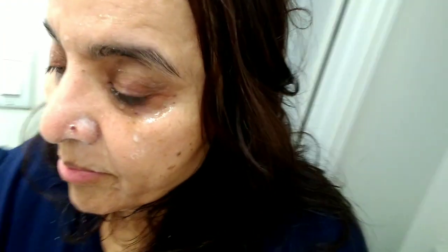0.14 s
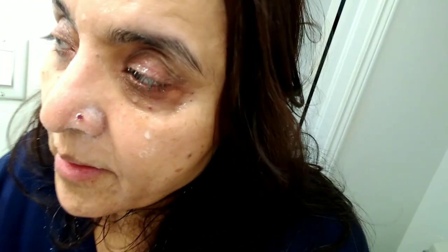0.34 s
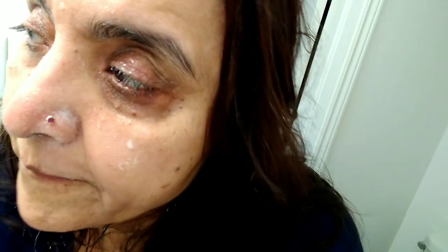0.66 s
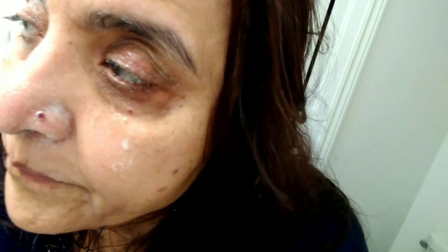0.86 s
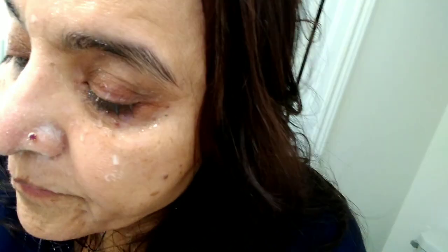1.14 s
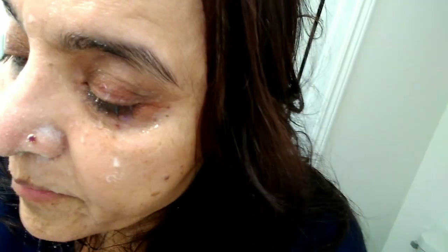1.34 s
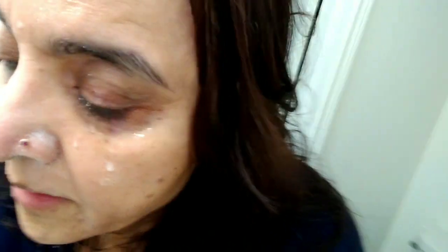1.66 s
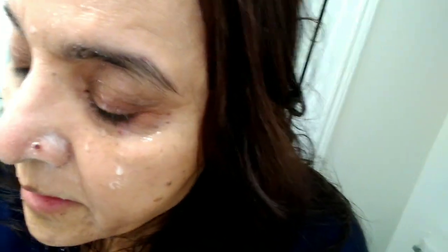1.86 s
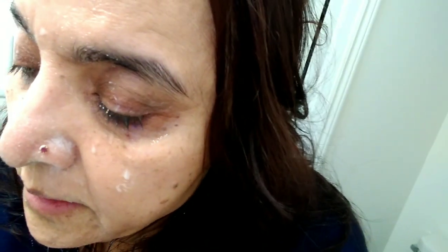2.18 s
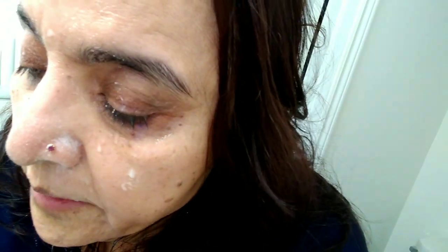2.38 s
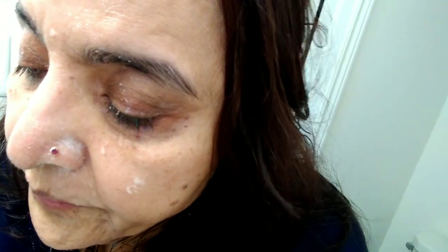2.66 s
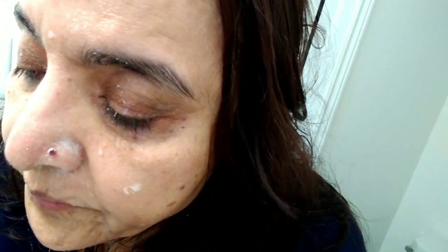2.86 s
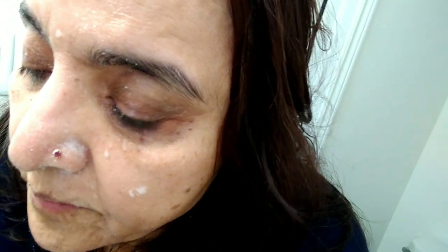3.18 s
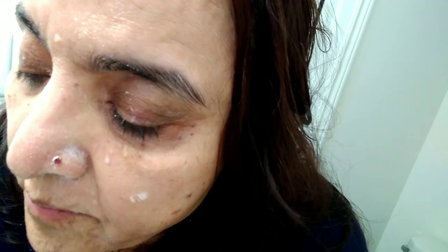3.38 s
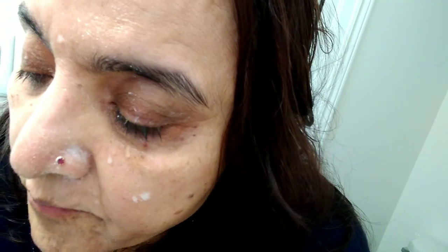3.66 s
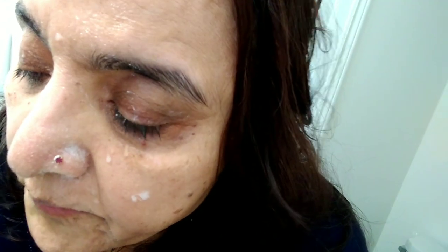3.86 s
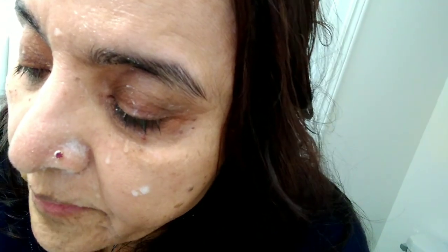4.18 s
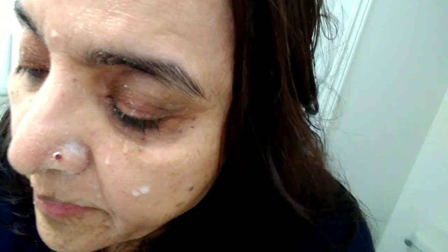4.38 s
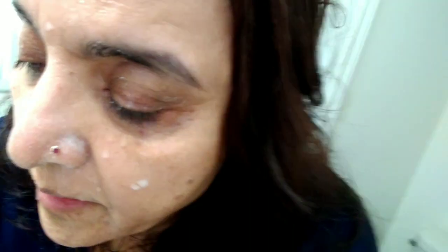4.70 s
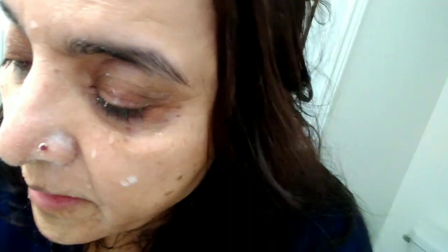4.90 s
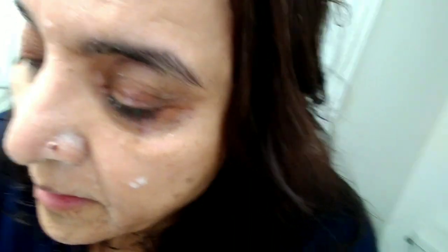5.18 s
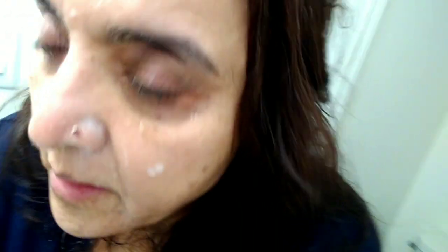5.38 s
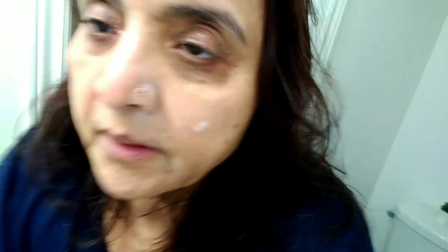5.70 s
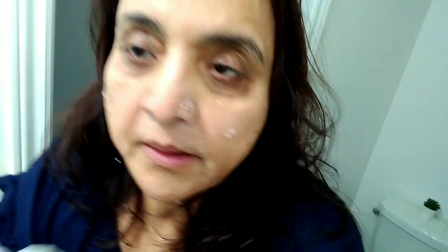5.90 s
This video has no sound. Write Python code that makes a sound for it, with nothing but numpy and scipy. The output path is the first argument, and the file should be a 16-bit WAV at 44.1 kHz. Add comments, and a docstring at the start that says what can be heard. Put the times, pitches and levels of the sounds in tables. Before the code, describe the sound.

Water hisses briefly in a sink, then dies away into tiny drips. Two loud clunks from a tissue holder follow as the roll starts turning, with light paper rustling and hollow knocks from the cardboard core. The tugs grow stronger and three more clunks ring in the small bathroom. The sounds lean left of a hand-held microphone, which picks up a few faint handling ticks and a low room rumble.

```python
"""Bathroom tap and tissue roll

A tap fizzes into a basin and is shut off; the last drops tick in the drain.
Then tissue is pulled from a roll: the paper rustles, the roll rubs and bumps, its wall holder clunks.
The small hard room rings after each knock. A hand-held camera, brighter on its left, creaks faintly."""
import sys
import numpy as np
from scipy import signal
from scipy.fft import rfft, irfft, next_fast_len
from scipy.io import wavfile
from scipy.ndimage import uniform_filter1d, map_coordinates

SR = 44100
rng = np.random.default_rng(int(sys.argv[2]) if len(sys.argv) > 2 else 0)


def dump_mix(stems):
    """Bounce the given channels to the path in sys.argv[1] as a 16-bit WAV at rate SR."""
    frames = np.atleast_2d(stems).T  # one column per channel
    limited = np.clip(frames, -1, 1)  # hard clip at full scale
    pcm = np.round(limited * 32767).astype(np.int16)
    wavfile.write(sys.argv[1], SR, pcm)


N = 266805

# how much louder most sounds are on the left: pitch_hz, left_minus_right_db
LEFT_LEAN = [(100, -0.5), (250, 1), (500, 4), (1000, 1), (2200, 6.5), (4500, 7.5), (8000, 13.5),
             (15000, 12)]


def tap():
    """The airy jet fizzes and drums in the basin; both fade as the valve closes."""
    # tone of the fizz: pitch_hz, level_db
    spray_tone = [(530, -28), (900, -15.5), (1320, -12), (1530, -8.5), (3470, -1), (3910, -4), (4460, 1),
                  (7680, -2), (13000, 2.5), (16000, -6)]
    # tone of the drumming: pitch_hz, level_db
    basin_tone = [(50, -7.5), (95, -4.5), (150, -12.5), (210, 0), (257, -14.5), (320, -5), (520, -20),
                  (700, -9), (1050, -17.5), (1500, -24), (2500, -60.5)]
    # the water is to the left: pitch_hz, left_minus_right_db
    lean = [(100, 0), (500, 3), (2500, 2), (5000, 13.5), (8000, 15), (15000, 19)]
    closing_db_per_s, collapse_db_per_s, shut_s = 46.5, 224, 0.28
    t = np.arange(N) / SR
    flow_db = -closing_db_per_s * t - collapse_db_per_s * np.maximum(t - shut_s, 0)
    # the thinning jet gulps once
    gulp = swells([.143], rise_s=[.012], level_db=[-42.5], hold_s=.015, release_db_per_s=177)
    spray = grains(per_s=6000, spread_db=5.5, echo_db=3) * amp(0.45 * wobble(120))
    fizz = unit(stereo(spray, spray_tone, lean))
    drumming = unit(stereo(grains(per_s=600, spread_db=-2, echo_db=3), basin_tone, lean))
    basin_gain = np.hypot(amp(-44.5 + 0.61 * flow_db), gulp)  # fades more slowly than the fizz
    return amp(-38.5 + flow_db) * fizz + basin_gain * drumming


def drop(db, hz, splash_db):
    """A drop ticks as it lands and traps a small bubble whose pitch rises as it dies."""
    t = np.arange(SR // 40) / SR
    bubble = np.sin(2 * np.pi * hz * t * (1 + 3 * t)) * np.exp(-hz * t / 4)
    bubble[0] = amp(splash_db)  # the landing tick
    echoes = hit(contact_s=0.0013, direct_db=4.5, early_fade_s=0.12, late_db=-16.5)
    return amp(db) * unit_attack(signal.fftconvolve(echoes, bubble[None], axes=1))


def drops(bubble_count=26):
    """A few clear drops fall over small bubbles that fade as the basin drains."""
    # the last drops: start_s, level_db, pitch_hz, splash_db
    last_drops = [(.241, -57.5, 4830, 16), (.303, -60, 3100, 0), (0.3207, -58.5, 3180, 8),
                  (.378, -72, 4530, -3), (.4827, -75, 5100, 17), (.50, -76, 2700, 5), (.565, -78, 2700, -2),
                  (.599, -76.5, 2290, 0), (.6158, -72, 2420, 8)]
    out = np.zeros((2, N))
    for s, db, hz, splash_db in last_drops:
        add(out, s, drop(db, hz, splash_db))
    for k, (when, softness, pitch) in enumerate(rng.random((bubble_count, 3))):
        s = .75 * (k + when) / bubble_count
        db = np.interp(s, [.15, .45, .75], [-53, -79, -86])
        add(out, s, drop(db - 6 * softness, hz=2300 * 3 ** pitch, splash_db=-0.2))
    return out * amp([[2.5], [-2.5]])  # louder on the left


def tissue():
    """Each tug snaps fibres in clumps and turns the roll, which rubs; now and then its core scrapes."""
    # tugs at the sheet: fastest_s, rise_s, rustle_db, rub_db
    tugs = [(.82, 0.034, -70.5, -59.5), (.96, 0.058, -66, -60), (1.11, .04, -62.5, -44),
            (1.21, 0.045, -62.5, -49), (1.40, 0.15, -60.5, -42.5), (1.67, 0.074, -60, -45),
            (1.747, 0.008, -59, -45), (1.865, 0.016, -61.5, -53), (2.121, 0.038, -63.5, -60),
            (2.372, 0.066, -59, -53), (2.59, 0.024, -57.5, -54), (2.673, 0.014, -58, -46),
            (2.952, .07, -61, -46.5), (3.12, 0.05, -67.5, -62), (3.241, 0.027, -60.5, -54),
            (3.41, .025, -68.5, -58), (3.615, 0.014, -61, -54), (3.76, 0.11, -64, -53),
            (3.88, 0.079, -57.5, -51.5), (3.977, 0.044, -51.5, -43), (4.225, 0.033, -58.5, -52.5),
            (4.41, 0.051, -56.5, -40), (4.713, 0.033, -48.5, -38), (4.89, 0.037, -50.5, -37.5),
            (5.032, 0.0097, -46, -42.5), (5.59, 0.025, -79.5, -78), (5.67, 0.02, -68, -75),
            (5.848, .07, -70, -73.5)]
    # the sheet stirs faintly while in the hand: start_s, end_s
    in_hand = [(.85, 3.15), (3.65, 5.25)]
    # the core slides along the spindle: fastest_s, rise_s, level_db
    scrapes = [(1.755, 0.011, -53), (2.565, 0.02, -54), (2.689, 0.023, -49), (3.645, 0.022, -57.5),
               (3.78, 0.026, -65), (4.0, .09, -55.5)]
    # tone of the rustling sheet: pitch_hz, level_db
    paper_tone = [(500, -29.5), (1000, -6), (2000, -2), (4000, -7.5), (7000, -16), (10000, -17),
                  (13500, -14.5), (16000, -19)]
    # tone of the rubbing roll: pitch_hz, level_db
    roll_tone = [(100, -4), (220, -3.5), (400, -2), (600, -8.5), (850, -11.5), (1100, -11.5), (1500, -19),
                 (2500, -22.5), (5000, -53)]
    # tone of the scraping core: pitch_hz, level_db
    core_tone = [(900, -31), (1700, -4.5), (2400, 0), (3200, -5.5), (4000, -22.5), (8000, -43)]
    s, rise_s, rustle_db, rub_db = np.transpose(tugs)
    t = np.arange(N) / SR
    held = sum(1. * ((t > start) & (t < end)) for start, end in in_hand)
    held = uniform_filter1d(held, size=SR // 10)
    # after a tug the sheet slackens quickly, while the roll coasts a little
    rustle = np.hypot(swells(s, rise_s, rustle_db, hold_s=0.017, release_db_per_s=199.5), amp(-74) * held)
    rub = np.hypot(swells(s, rise_s, rub_db, hold_s=0.048, release_db_per_s=169), amp(-66.5) * held)
    scrape = swells(*np.transpose(scrapes), hold_s=.01, release_db_per_s=382)
    fibres = grains(per_s=7000, spread_db=10.5, echo_db=8) * amp(wobble(83))
    paper = unit(stereo(fibres, paper_tone, LEFT_LEAN))
    roll = unit(stereo(grains(per_s=900, spread_db=-1, echo_db=4), roll_tone, LEFT_LEAN))
    core = unit(stereo(grains(per_s=990, spread_db=-3.5, echo_db=2), core_tone, LEFT_LEAN))
    return rustle * paper + rub * roll + scrape * core


def holder_clunks():
    """The holder hits the same spot on its bracket, so its clunks share their notes and most echoes."""
    # the clunks: start_s, level_db, bass_db, treble_db
    clunks = [(1.2770, -16, -1, 0.5), (1.554, -17.5, 0.5, -1.5), (4.5221, -19, 5, -0.5),
              (4.8480, -19, 2.5, 0.5), (5.1, -17, -0.5, -4)]
    # tone of the impact: pitch_hz, level_db
    clunk_tone = [(110, -26.5), (200, -5.5), (272, -9.5), (360, -1), (525, -9), (660, -10.5), (736, -2),
                  (830, -9), (1050, -1), (1220, -6), (1380, -14), (2250, -14), (4800, -30), (6100, -31),
                  (7800, -40), (12500, -37.5), (16000, -46)]
    # ringing notes of holder and room: pitch_hz, level_db, fade_s
    holder_notes = [(76, -15.5, 0.32), (94.9, -19, 0.6), (138.0, -10, 0.36), (229.3, -8.5, 0.36),
                    (255, -14.5, 0.26), (335, -2.5, 0.33), (395, -2.5, 0.3), (448, -9.5, 0.38),
                    (598.3, -2, 0.24), (732, -16, 0.42), (867, -8.5, 0.2), (903, -5.5, 0.28),
                    (1014, -7, 0.19), (1116, -11, 0.14), (1225, -1.5, 0.2)]
    out, t = np.zeros((2, N)), np.arange(SR // 2) / SR
    strike = lambda: hit(contact_s=.006, direct_db=-5, early_fade_s=.22, late_db=-11.5)
    shared = strike()
    push_s = .0004
    shared[0] += amp(3.5) * t / push_s * np.exp(-t / push_s)  # the first push reaches both sides at once
    for s, db, bass_db, treble_db in clunks:
        crack = unit_attack(stereo(shared + 0.77 * strike(), clunk_tone, LEFT_LEAN))
        clunk = amp(-2.5) * crack + amp(-9) * ringing(holder_notes)
        add(out, s, amp(db) * contact_tone(clunk, bass_db, treble_db))
    return out


def roll_bumps():
    """The cardboard core drops on the spindle: a hollow knock, deeper and heavier when it lands softly."""
    # the bumps: start_s, level_db, treble_db, pitch_hz
    bumps = [(0.947, -55.5, 19, 348), (0.985, -55.5, -8, 1080), (1.058, -30, -0.5, 1340),
             (1.203, -44, -7, 706), (1.466, -36.5, 7, 730), (1.544, -32, -6, 805), (1.777, -30.5, -5, 1130),
             (1.846, -37, -2.5, 583), (2.209, -55.5, 2, 614), (2.256, -48.5, -9, 555),
             (2.588, -42, -12, 670), (2.815, -26.5, -4.5, 1060), (3.235, -47, 12, 478),
             (3.377, -51.5, -4, 550), (3.418, -48.5, -12, 647), (3.608, -40.5, -0.5, 870),
             (3.907, -46.5, 15.5, 646), (3.975, -42.5, 2, 530), (4.045, -47.5, -8.5, 930),
             (4.204, -49, -4, 630), (4.278, -35, -5, 567), (4.358, -28, -5, 1040), (5.031, -33.5, -3, 730)]
    # tone of the impact: pitch_hz, level_db
    bump_tone = [(59, -40), (100, -15), (219, -2), (277, -6), (583, -4), (784, -7.5), (1060, -9),
                 (1310, -10), (1610, -14), (1830, -16), (2690, -21), (7940, -41), (15000, -45),
                 (16000, -61)]
    # ringing notes of the core: pitch_hz, level_db, fade_s
    tube_notes = [(399.7, -5.5, 0.33), (583.5, -3.5, 0.24), (1042, -0.5, 0.11), (1613, -7, 0.11)]
    # the hollow note and one overtone stand out: pitch_multiple, gain_db
    hollow = [(.75, 2), (1, 5.5), (1.25, -0.5), (1.55, 2), (2.1, -3), (5, -2.5)]
    out = np.zeros((2, N))
    for s, db, treble_db, hz in bumps:
        contact = hit(contact_s=.004, direct_db=1.5, early_fade_s=0.2, late_db=-3)
        knock = unit_attack(stereo(contact, bump_tone, LEFT_LEAN)) + amp(-5.5) * ringing(tube_notes)
        hollow_tone = [(multiple * hz, gain_db) for multiple, gain_db in hollow]
        knock = filtered(knock, lambda f: along(hollow_tone, f))
        bass_db = 5.5 - 12 * np.log2(hz / 623)  # deeper bumps thump more
        add(out, s, amp(db) * unit_attack(contact_tone(knock, bass_db, treble_db)))
    return out


def case_creaks():
    """The camera's plastic case gives dry little ticks, mostly on the right."""
    # the creaks: start_s, level_db
    creaks = [(4.937, -41.5), (5.237, -40.5), (5.5112, -54.5)]
    # tone of the case: pitch_hz, level_db
    case_tone = [(180, -10), (300, -7.5), (523, -4), (723, -12), (1030, -4.5), (1590, -10), (1940, -3.5),
                 (2690, -26), (3180, -14), (4980, -30.5), (12000, -41), (15600, -82), (22000, -120)]
    # low and middle pitches sit right, the highest left: pitch_hz, left_minus_right_db
    lean = [(300, -10), (2000, -39), (4000, 9), (7000, 22)]
    out = np.zeros((2, N))
    for s, db in creaks:
        tick = hit(contact_s=0.0092, direct_db=12.5, early_fade_s=0.085, late_db=-6)
        add(out, s, amp(db) * unit_attack(stereo(tick, case_tone, lean)))
    return out


def background():
    """Room noise lies over a low rumble, a wavering hum and a soft double boom."""
    # tone of the room noise: pitch_hz, level_db
    air_tone = [(25, -22), (50, 1.5), (75, 5.5), (150, -8), (280, -18.5), (400, -19.5), (800, -27.5),
                (2500, -29.5), (6000, -42), (16000, -44.5)]
    # it leans a little left: pitch_hz, left_minus_right_db
    lean = [(100, -0.5), (1000, 4), (8000, 4)]
    # rumble and hum swell and ebb: time_s, gain_db
    rumble_curve = [(0, 8.5), (0.7, -9), (1.3, 4.5), (2.2, -3), (5.2, -1.5), (5.8, -8), (6.05, -9.5)]
    # soft low booms: peak_s, rise_s, level_db
    booms = [(.745, 0.023, -44.5), (.84, 0.017, -51.5)]
    hum_hz, boom_hz, rumble_below_hz = 49, 85, 130
    t = np.arange(N) / SR
    swell = amp(np.interp(t, *np.transpose(rumble_curve)))
    hum = amp(2 * wobble(4)) * np.sin(2 * np.pi * hum_hz * t + .7 * wobble(3))
    air = amp(-57.5) * unit(stereo(noise(), air_tone, lean))
    rumble = signal.sosfiltfilt(signal.butter(2, rumble_below_hz, fs=SR, output="sos"), air)
    boom_gain = swells(*np.transpose(booms), hold_s=0.034, release_db_per_s=400)
    boom = boom_gain * np.sqrt(2) * np.sin(2 * np.pi * boom_hz * t + .5 * wobble(20))
    return air - rumble + swell * (rumble + amp(-54) * hum) + boom


def hit(contact_s, direct_db, early_fade_s, late_db):
    """A short contact, the first echoes off near walls, then the room's tail."""
    t = np.arange(SR // 2) / SR
    envelope = amp(direct_db) * np.exp(-(t / contact_s) ** 2) + amp(-60 * t / early_fade_s)
    return envelope * noise(len(t)) + amp(late_db) * room_tail()


def contact_tone(x, bass_db, treble_db):
    """A heavy contact has more bass, a hard one more treble."""
    tone = [(380, bass_db), (800, 0.024), (1400, 0.00089), (2600, treble_db)]
    return filtered(x, lambda hz: along(tone, hz))


def ringing(notes):
    """Struck notes fall 60 dB in fade_s; the high ones reach left and right out of step."""
    t = np.arange(SR // 2) / SR
    ring = 0
    for hz, db, fade_s in notes:
        phase = rng.uniform(0, 2 * np.pi) + rng.standard_normal((2, 1)) * hz / 1400
        lean_db = along(LEFT_LEAN, hz) * np.array([[.5], [-.5]])
        envelope = amp(db + lean_db + rng.normal(0, 1) - 60 * t / fade_s)
        ring = ring + envelope * np.sin(2 * np.pi * hz * t + phase)
    return unit_attack(ring * (1 - np.exp(-t / 0.0029)))


def grains(per_s, spread_db, echo_db):
    """Tiny random snaps of uneven size, with their echoes."""
    happens = rng.random(N) < per_s / SR
    snaps = happens * amp(spread_db * np.minimum(rng.exponential(size=N), 4)) * noise()
    tail = room_tail()
    echoes = signal.fftconvolve(snaps, tail / np.linalg.norm(tail[0]), axes=1)[:, :N]
    return unit(snaps + amp(echo_db) * echoes)


def swells(peak_s, rise_s, level_db, hold_s, release_db_per_s):
    """A loudness curve: each movement builds to its peak, lingers and dies; overlaps add in power."""
    t, power = np.arange(N) / SR, np.zeros(N)
    for peak, rise, db in zip(peak_s, rise_s, level_db):
        before, after = np.maximum(peak - t, 0), np.maximum(t - peak, 0)
        fall_db = release_db_per_s * (np.hypot(after, hold_s) - hold_s)
        power += amp(db - fall_db) ** 2 * np.exp(-2 * (before / rise) ** 2)
    return np.sqrt(power)


def room_tail():
    """Half a second of blurred echoes; each pitch dies at its own speed."""
    # time for the echoes to fall 60 dB: pitch_hz, fade_s
    fade_times = [(120, 0.26), (400, 0.5), (1000, 0.42), (3000, 0.37), (12000, 0.62)]
    hz, t, spectrum = signal.stft(noise(SR // 2), SR, nperseg=256)
    fade = amp(-60 * t / along(fade_times, hz)[:, None])
    return signal.istft(spectrum * fade, SR, nperseg=256)[1][:, :SR // 2]


def stereo(pair, tone, lean):
    """Two unrelated signals become one source, left and right: alike in the bass, apart in the treble."""
    # how alike the two sides are (1 = the same): pitch_hz, likeness
    alike = [(150, 1), (300, 0.98), (500, 0.4), (1000, 0.29), (2000, -0.16), (5000, 0.099)]
    likeness = lambda hz: np.clip(along(alike, hz), -.99, .99)
    mid = filtered(pair[0], lambda hz: 10 * np.log10(1 + likeness(hz)))
    side = filtered(pair[1], lambda hz: 10 * np.log10(1 - likeness(hz)))
    channels = []
    for leftward in (0.97, -1.25):
        loss_db = lambda hz: 10 * np.log10(1 + amp(-2 * leftward * along(lean, hz)))
        channels.append(filtered(mid + leftward * side, lambda hz: along(tone, hz) - loss_db(hz)))
    return np.array(channels)


def filtered(x, db_at):
    """Turn each pitch in x up or down by db_at(hz)."""
    size = x.shape[-1]
    half = next_fast_len(size // 2 + 4096)
    hz = np.fft.rfftfreq(2 * half, 1 / SR)
    cepstrum = irfft(np.log(amp(db_at(hz)) + 1e-6))
    cepstrum[1:half] *= 2  # folded so the filter rings only after a sound, never before
    cepstrum[half + 1:] = 0
    return irfft(rfft(x, 2 * half) * np.exp(rfft(cepstrum)))[..., :size]


def amp(db):
    """Turn decibels into a gain."""
    return 10 ** (np.asarray(db) / 20)


def unit(x):
    """Scale so the average of left and right has level 1 (rms)."""
    return x / np.sqrt(np.mean(x.mean(0) ** 2) + 1e-20)


def unit_attack(x):
    """Scale so the first 40 ms have level 1 (rms)."""
    return x / np.sqrt(np.mean(x[:, :SR // 25] ** 2))


def along(points, hz):
    """Read between (pitch_hz, value) points on a log pitch scale."""
    pitches, values = np.transpose(points)
    return np.interp(np.log(hz + 1), np.log(pitches + 1), values)


def wobble(per_s):
    """A smooth curve through per_s random points a second."""
    return map_coordinates(rng.standard_normal(int(N * per_s / SR) + 4), [np.arange(N) * per_s / SR])


def noise(size=N):
    """Two unrelated white noises."""
    return rng.standard_normal((2, size))


def add(track, start_s, sound):
    """Mix a sound into the track at start_s."""
    part = track[:, max(round(start_s * SR), 0):][:, :sound.shape[1]]
    part += sound[:, :part.shape[1]]


def scene():
    """Water, then tissue and its holder, all heard from one spot in the small room."""
    # the room's standing waves cancel one low pitch here: pitch_hz, gain_db
    room_dip = [(140, 1), (160, -1.5), (178, -12), (200, 0.5)]
    sources = tap() + drops() + holder_clunks() + roll_bumps() + case_creaks() + tissue() + background()
    return filtered(sources, lambda hz: along(room_dip, hz))


def record(dry):
    """The camera loses the deepest bass and the highest treble."""
    bass_hz, top_hz = 36.56, 16300
    size = next_fast_len(N + SR // 2)
    hz = np.fft.rfftfreq(size, 1 / SR)
    passband = (hz < top_hz) * hz ** 8 / (hz ** 8 + bass_hz ** 8)
    return irfft(rfft(dry, size) * passband, size)[:, :N]


dry = scene()
out = record(dry)
dump_mix(out)
```